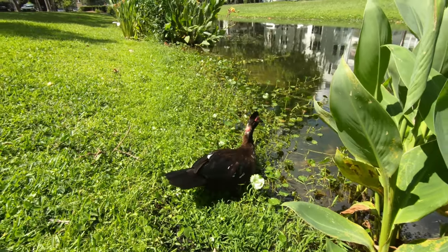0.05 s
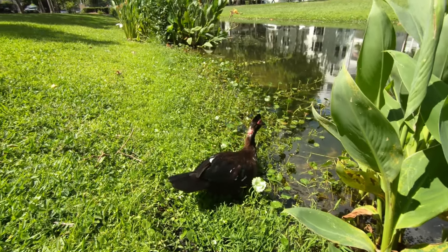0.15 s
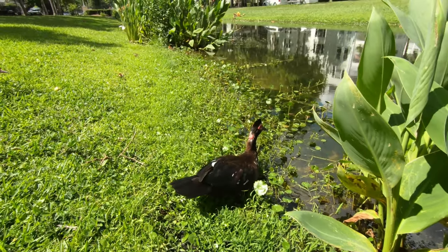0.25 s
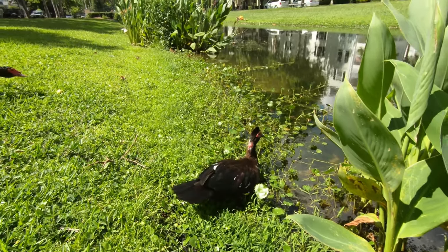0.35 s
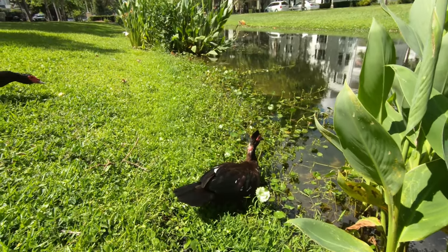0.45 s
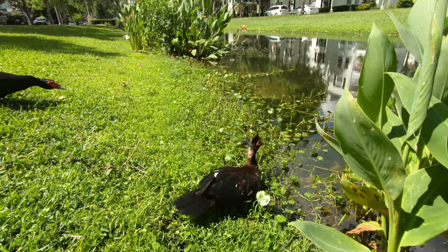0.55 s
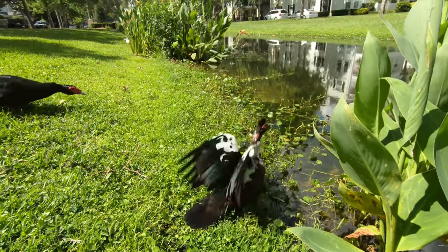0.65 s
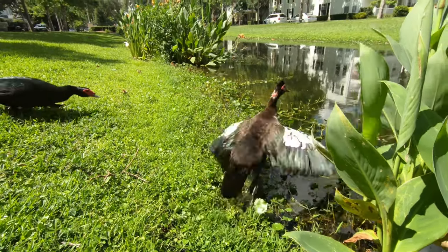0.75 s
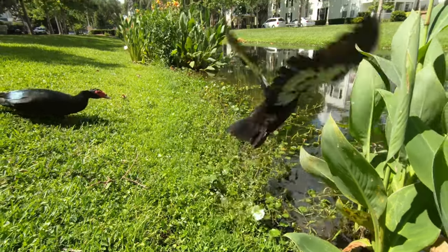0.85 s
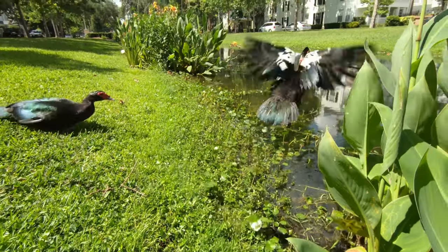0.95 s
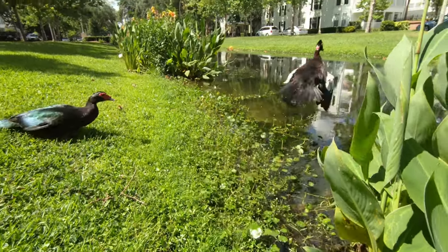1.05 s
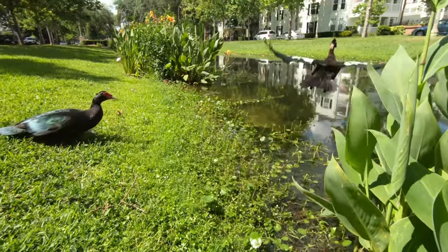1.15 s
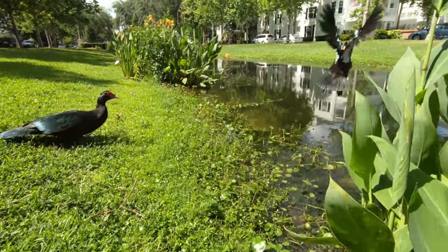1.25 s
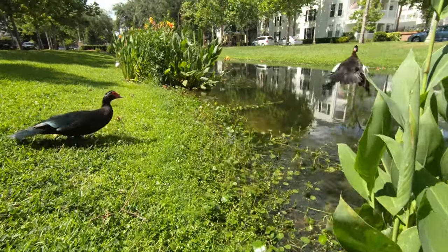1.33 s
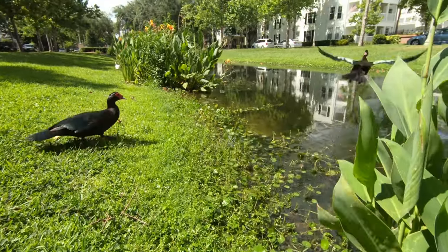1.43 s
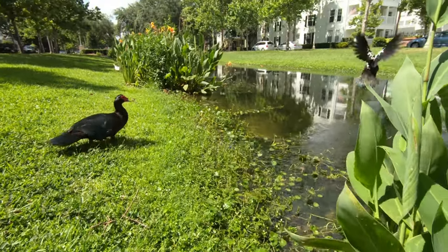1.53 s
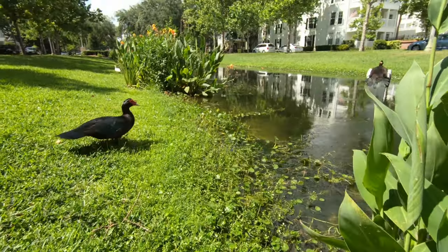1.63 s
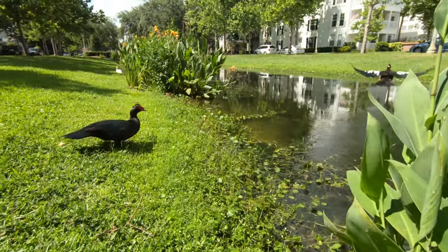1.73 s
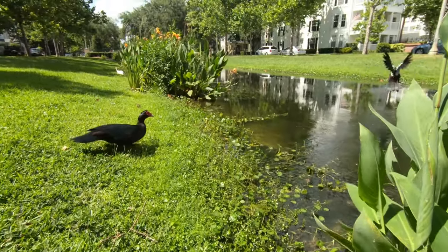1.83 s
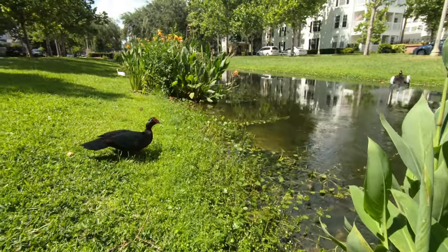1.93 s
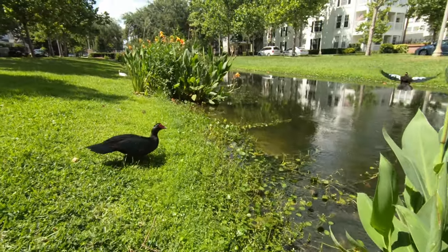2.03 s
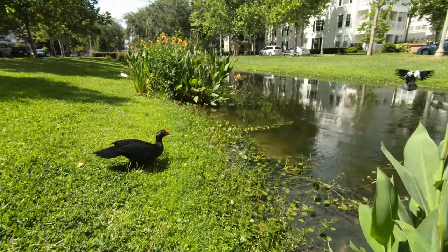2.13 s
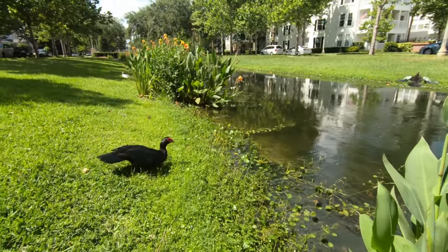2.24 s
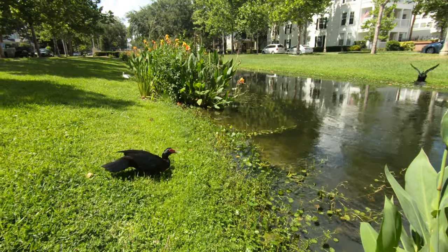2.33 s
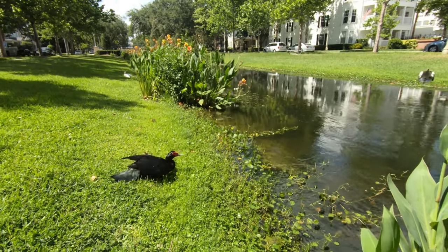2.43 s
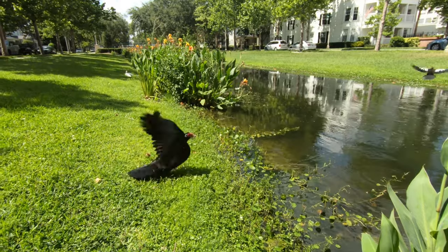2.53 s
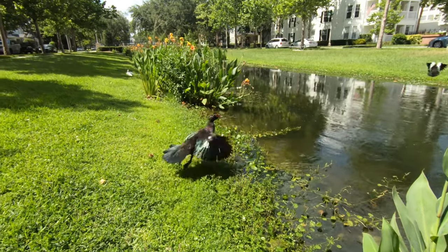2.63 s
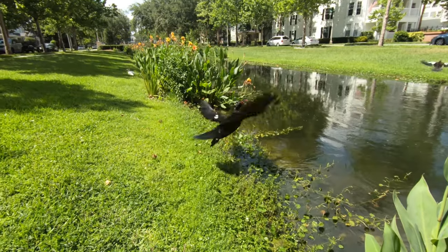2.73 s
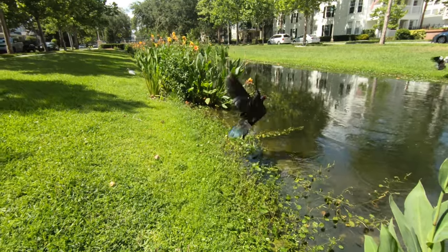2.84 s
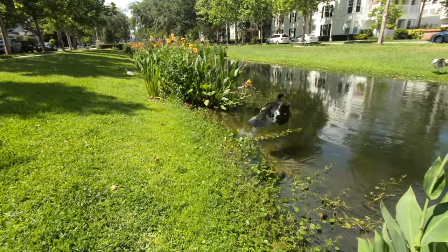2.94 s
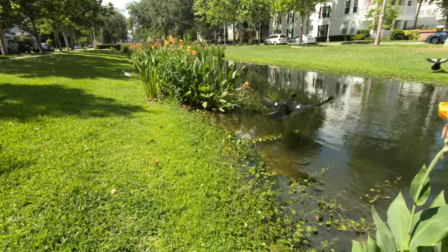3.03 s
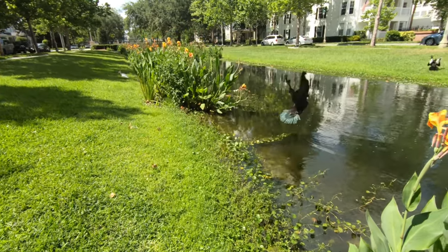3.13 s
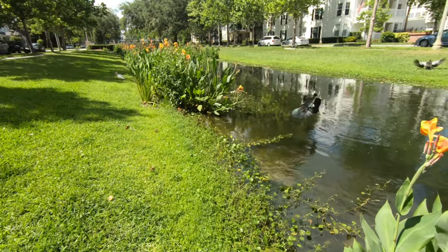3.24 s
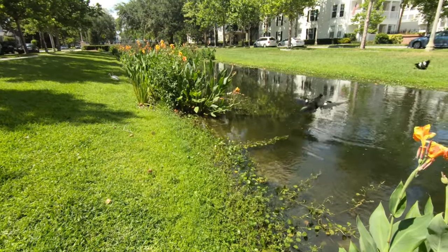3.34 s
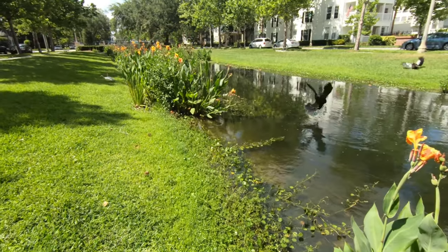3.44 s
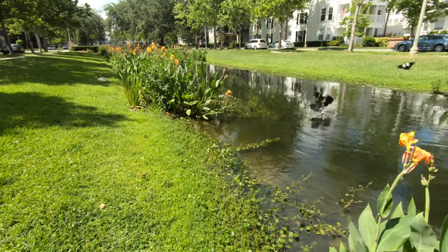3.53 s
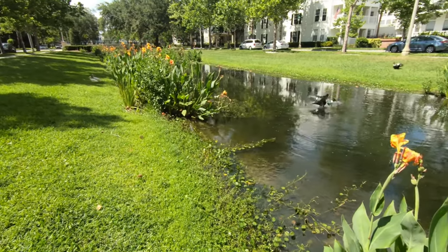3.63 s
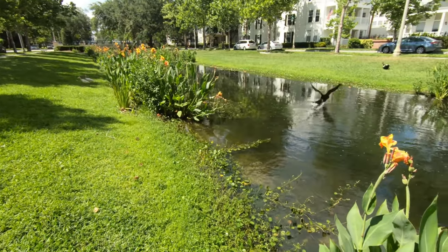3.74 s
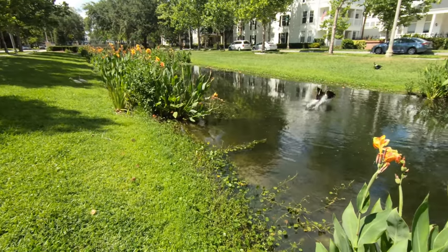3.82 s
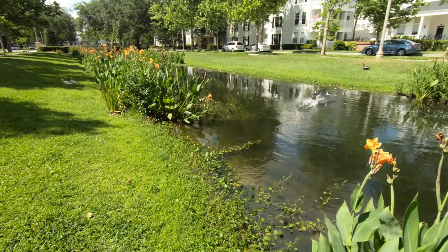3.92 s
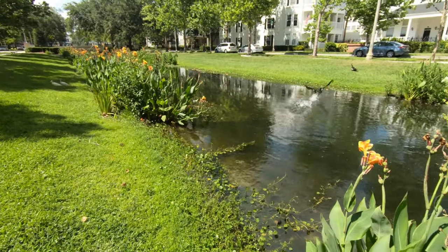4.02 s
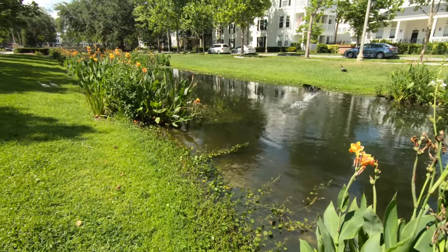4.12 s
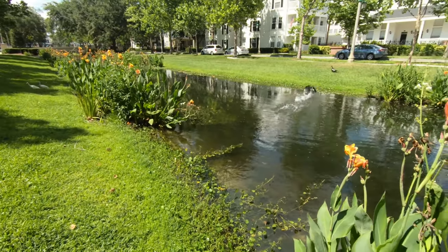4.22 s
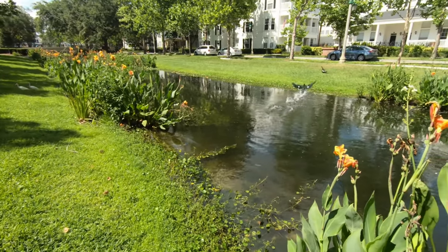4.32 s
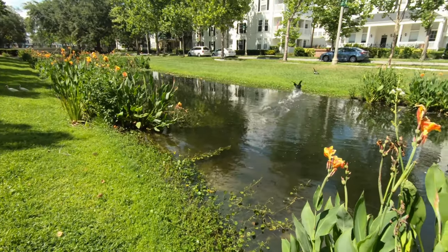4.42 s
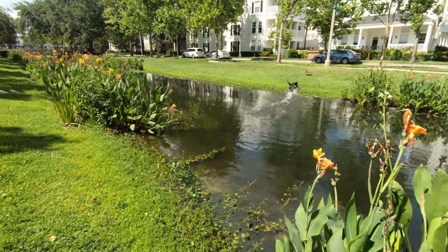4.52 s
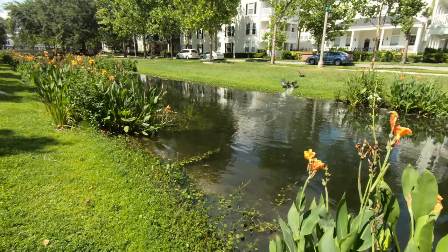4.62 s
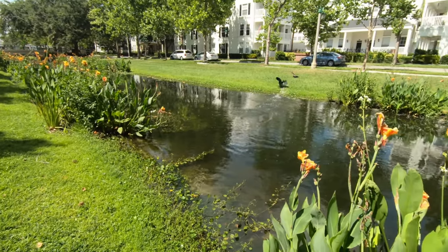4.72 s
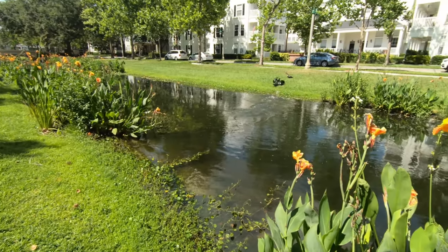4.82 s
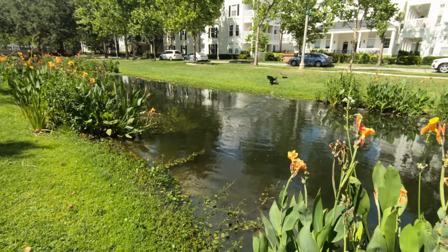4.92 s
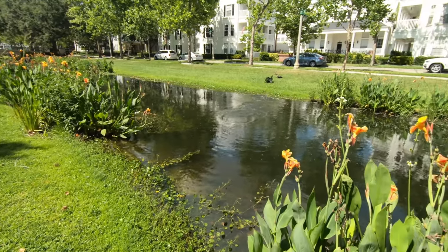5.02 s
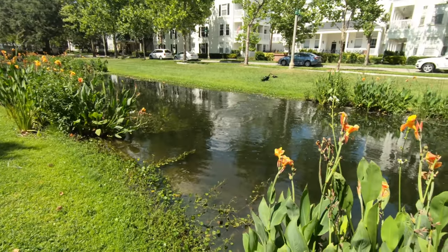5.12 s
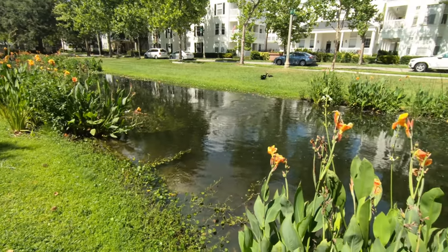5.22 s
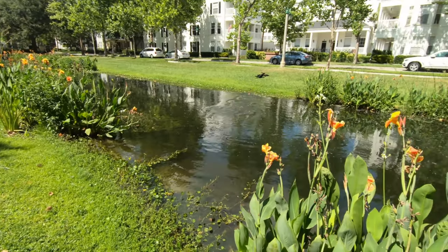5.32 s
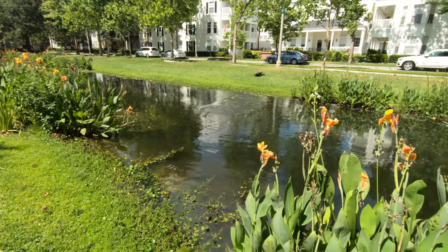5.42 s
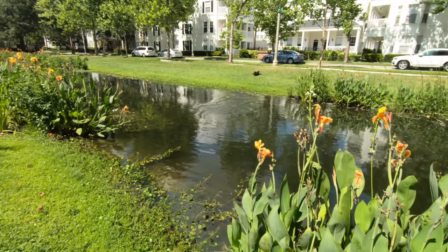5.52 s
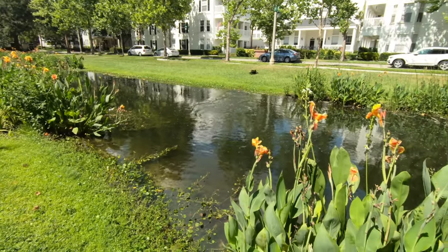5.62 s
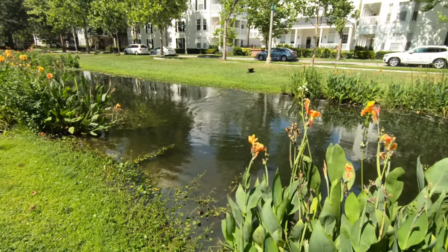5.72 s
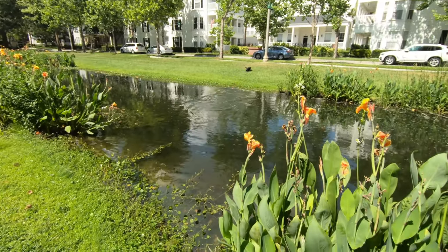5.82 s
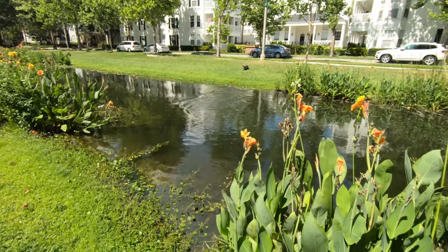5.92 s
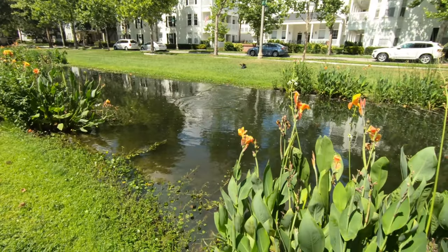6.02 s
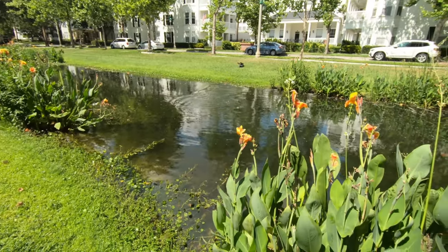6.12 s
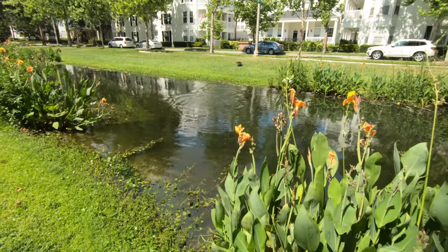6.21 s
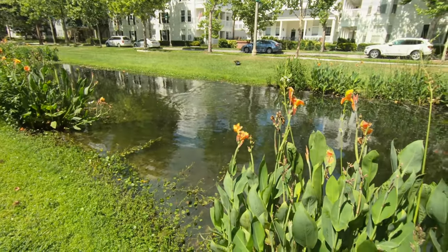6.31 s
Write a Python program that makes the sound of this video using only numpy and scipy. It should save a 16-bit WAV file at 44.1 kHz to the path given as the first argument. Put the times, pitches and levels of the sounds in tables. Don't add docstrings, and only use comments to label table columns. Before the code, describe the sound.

Close wingbeats whoosh and flutter as one duck, then another, takes off over water with slaps, splashes and bubbling, wind thumping softly.

```python
import sys
import numpy as np
from scipy import signal
from scipy.fft import rfft, irfft, next_fast_len
from scipy.io import wavfile
from scipy.ndimage import uniform_filter1d, map_coordinates

SR = 44100
rng = np.random.default_rng(int(sys.argv[2]) if len(sys.argv) > 2 else 0)


def volts(x):
    e = np.asarray(x, float) / 20
    return 10 ** e


def master_out(mix):
    frames = np.transpose(np.atleast_2d(mix))
    ceiling = np.clip(frames, -1, 1)
    pcm = np.round(ceiling * 32767).astype(np.int16)
    wavfile.write(sys.argv[1], SR, pcm)


N = 280506

# [t/s, flutter peak level/dB, flutter f/Hz, overtones level/dB, extra effort/dB]
FIRST_DUCK = [(0.895, -19.5, 223, -6.5, 0), (1.039, -30, 205, -9, -1), (1.183, -32, 210, -15, -1.5),
              (1.327, -31, 226, -7, -1), (1.474, -24.5, 227, -15, 0), (1.619, -38.5, 254, -21, 2),
              (1.765, -35, 200, -3, 0.5), (1.918, -33, 214, -8, 3), (2.064, -41, 224, -5, 0)]
SECOND_DUCK = [(2.773, -24.5, 232, -7.5, -3), (2.918, -20, 233, -4, 1), (3.061, -27.5, 235.5, -3, 0.9),
               (3.212, -28, 214, -23, 2), (3.359, -33, 227, -18, 1.5), (3.51, -29.5, 248, -19, 3.5),
               (3.659, -32, 245, -16, 5.5), (3.803, -29.5, 228, -7, 2), (4.129, -44, 223, -7, 3),
               (4.238, -45.5, 263, 0, 7), (4.371, -41.5, 231, 0, 1), (4.515, -43, 222, -11, 8)]
# [multiple of f, level/dB]
FLUTTER_OVERTONES = [(2, 3), (3, -9.5), (4, -25), (5, -47)]
# [low whoosh level/dB, high whoosh level/dB, upstroke level/dB, fading/(dB/s), upstroke delay/s]
FLIGHT = [
    (-23.5, -21.5, -21.5, 20.5, 0.024),
    (-26.5, -23, -25, 13, 0.038),
]
# [f/Hz, level/dB]
FEATHERS = [(1180, -4), (2000, -8), (2520, 3.5), (3970, 4), (5000, 3.5), (6360, -6.5), (10300, -12),
            (15500, -23)]
# [t/s, peak level/dB, low part/dB, top part/dB, length/s]
SWISHES = [(2.48, -50.5, -5, 5, .06), (2.6, -48, 0, 6, .02), (.93, -34, -3, -2, .008),
           (1.07, -36, 2, -2, .008), (1.213, -39, 0, -1, .005), (1.474, -41, 0, 0, .004),
           (2.965, -37, 2, -9, .008), (3.44, -38, 2, -15, .012), (3.545, -40, 3, -10, 0.007),
           (3.4, -40, 3, -13, 0.0074), (.696, -31.5, -10, -3, .012), (0.723, -37.5, -13, 5.5, 0.029),
           (0.776, -19, -6, -16, 0.0056), (0.987, -23.5, 1.5, -11, 0.0063), (1.25, -37, 1, -20, 0.012),
           (2.566, -29, -5.5, -3, 0.01), (2.648, -29.5, 5, -1, 0.011), (2.752, -33, 8, -20, 0.015),
           (2.634, -27, 0, -4, .004), (4.31, -33, -2, -14, .012), (4.357, -34, 4, -14, 0.0057),
           (1.03, -36, 8, -12, .006), (1.172, -40, 8, -12, .006), (2.688, -24.5, 4.5, -27, 0.011),
           (2.847, -27, -2, -29, 0.011), (3.134, -31.5, -4, -32, 0.017), (3.288, -37, -1, -26, 0.014),
           (3.774, -26, -15, -33, 0.026), (3.997, -34, -14, -16, 0.0069), (4.056, -30.5, -0.5, -19, 0.043)]
# [f/Hz, level/dB]
PLANTS = [(59, -29), (100, -1.5), (349, -5), (550, -6.5), (764, -1.5), (1240, -4), (1600, -5), (1780, -7.5),
          (3300, -7.5), (4620, -4), (5480, -12), (11500, -23.5), (15800, -32)]
# [t/s, peak level/dB, low part/dB, top part/dB]
SLAPS = [(0.7119, -26, 0, -11), (.7975, -15, -9.5, -16), (.729, -30, -15, -16), (1.471, -34, 6, -12),
         (3.249, -35.5, 15, -14), (0.805, -9.5, -7, -18), (2.557, -27, -2, -7), (2.5884, -36, -15, -18),
         (2.6337, -19, 4, 2), (2.762, -21, 3, -4), (3.0504, -42, -6, -13), (3.7064, -26, -16, -23),
         (3.727, -26, -25, -28), (3.742, -30, 2.5, -30), (3.825, -29, -24, -27), (3.89, -23, -5, -25),
         (3.904, -32, 10, -20), (3.9937, -24, -1, -4.5), (4.239, -35, -5, -19), (4.3562, -30.5, 9.5, -20),
         (4.3697, -27.5, 7, -18), (4.492, -29, -3, -6), (4.533, -40, -17, -13), (4.7817, -30, -19, -23),
         (4.8942, -36.5, -14, 1), (4.9213, -39, -15, -20)]
# [t/s, peak level/dB, f/Hz, t60/s, rise/s]
SNAPS = [(0.7958, 0.8, 4040, 0.0026, 0.00011), (2.633, -23, 1680, 0.016, 0.00031),
         (2.634, -23, 2270, .008, 0.00023), (2.6333, -27, 12300, 0.0044, .0001),
         (3.9945, -38, 11000, 0.0037, .0001), (2.6341, -14, 7560, 0.0033, .0001),
         (.8055, -15, 3600, .006, .0003), (5.1, -35, 5000, .003, .0001), (2.694, -26, 2700, 0.051, 0.0032),
         (2.848, -25, 2670, 0.039, 0.0033), (4.3577, -29, 1170, 0.01, .0004), (4.4, -37, 8060, .004, .0002),
         (5.131, -35.5, 6200, 0.0043, 0.00017), (6.18, -42, 8200, 0.0042, .0002)]
# [t/s, fizz level/dB, slosh over fizz/dB, dying/(dB/s)]
SPRAY = [(.705, -43.5, 0, 12.5), (0.781, -34.5, 4, 68), (.9, -42, 3, 90), (1.0, -57, 7, 3),
         (2.64, -45.5, 6.5, 50), (2.78, -41, 8, 57), (2.939, -41.5, 7.5, 77), (3.05, -49.5, 5.5, 6),
         (3.681, -42, -11, 22), (3.84, -56, 9, 34), (3.96, -43.5, -3.5, 21), (4.14, -46.5, 2, 22),
         (4.35, -44.5, 1.5, 31), (4.52, -49, -12, 31), (4.68, -57, 2, 29)]
# [f/Hz, level/dB]
FIZZ = [(1180, -39), (2000, -4.5), (2930, -7.5), (3630, -4.5), (4710, -2), (6000, -12.5), (8550, -15),
        (8780, -15.5), (11000, -16.5), (15800, -30)]
SLOSH = [(180, 1), (300, 1), (500, -4.5), (1000, -6), (1700, -6), (2500, -22), (3300, -32), (5500, -120)]
# [f/Hz, level/dB]
DROPS = [(2200, -14), (2900, -8), (3600, -5.5), (4300, -1), (5000, -9), (7500, -12)]
# [t of the peak/s, peak level/dB, f/Hz]
AIR_POCKETS = [(.812, -27, 1140), (.8427, -22.5, 754), (.867, -30, 1300), (.9305, -35, 1470),
               (.9683, -37, 1150), (1.0512, -31, 452), (1.0814, -37, 474), (1.255, -38, 800),
               (1.3944, -39, 797), (2.6671, -33.5, 624), (2.8423, -31.5, 668), (2.9093, -29, 603),
               (2.9971, -39, 1460), (3.1521, -39, 1440), (3.2256, -37, 592), (4.5038, -39, 1690),
               (0.9941, -32, 430.0), (1.0362, -27, 387), (1.0434, -31, 715), (1.1828, -37, 730.0),
               (1.19, -25, 420), (1.3293, -38, 786), (2.6993, -31, 926), (2.7661, -29, 700),
               (2.7661, -25.5, 1675), (2.7704, -27.5, 980), (2.8082, -28, 540), (2.8096, -27.5, 816),
               (2.8212, -33, 1360), (2.917, -33.5, 1860), (2.9185, -31, 910), (2.9185, -24, 560.0),
               (2.9228, -33, 1120.0), (3.0578, -37, 940), (3.0607, -30.5, 1790), (3.0636, -34, 2080),
               (3.0737, -27.5, 515), (3.1057, -35, 1070), (3.1449, -38, 1030.0), (3.2073, -34, 1070),
               (3.2145, -34, 830), (3.216, -31, 1400), (3.216, -32, 506), (3.2537, -32, 1070),
               (3.258, -32, 564), (3.364, -31.5, 1440), (3.3698, -34, 980), (3.5106, -30, 1440),
               (3.5164, -30.5, 1010), (3.5498, -34, 1020), (3.6571, -39, 1360), (3.66, -40, 1597),
               (3.6615, -29, 480), (3.7442, -35, 1555), (4.2405, -36.5, 1680.0), (4.242, -35, 438),
               (4.2638, -35.5, 520.0), (4.3595, -38, 474), (4.3595, -35.5, 1635), (4.3595, -40, 1050)]
# [t of the peak/s, peak level/dB, f/Hz]
DRIPS = [(.7983, -16, 3970), (.8655, -29, 4770), (.9005, -28, 4610), (.908, -30, 3700), (.9232, -28, 3830),
         (.991, -31, 3700), (.991, -33, 4700), (1.078, -33, 4300), (1.217, -36, 5000), (2.5663, -37, 3000),
         (2.588, -33, 5000), (2.6418, -33, 2930), (2.9488, -37, 4020), (3.6663, -33, 4750),
         (3.7055, -33, 4830), (4.5017, -38, 4230), (0.7787, -26, 4410.0), (0.8159, -23, 4690.0),
         (0.8186, -25, 3000), (0.8254, -18, 2780), (0.8277, -24, 3760), (0.8313, -18, 4690.0),
         (0.8417, -16, 4580), (0.849, -21, 4450), (0.8526, -31, 3470), (2.6893, -28, 4270.0),
         (2.6952, -32, 2700), (2.7651, -36, 3170.0), (2.7669, -26, 4200), (2.8535, -33, 2730),
         (2.9469, -41, 4690.0), (3.0676, -30, 4820.0), (3.2122, -27.5, 4200), (3.6866, -29.5, 3860.0),
         (3.7075, -33, 3860.0), (3.7202, -34, 4160), (3.7293, -33, 4690.0), (3.7315, -28, 3860.0),
         (3.746, -30, 2760.0), (3.8227, -33, 4100), (3.8259, -35, 4960.0), (3.8286, -31, 3580.0),
         (3.8494, -39, 4810), (3.8576, -40, 4550.0), (3.8912, -28, 3980), (3.9737, -41, 4440),
         (3.9955, -27, 4820.0), (4.0014, -30, 3660), (4.0127, -32, 3720.0), (4.0599, -37, 4820.0),
         (4.0608, -33, 2870), (4.239, -38, 4000.0), (4.2798, -32, 4270.0), (4.4934, -33, 4500),
         (4.4939, -38, 3600), (4.5175, -38, 4690.0), (4.5351, -32, 3720.0), (4.5356, -31, 5400),
         (4.5356, -29, 4650), (4.5914, -40, 4960.0)]
# [t of the peak/s, peak level/dB, f/Hz]
FINE_SNAPS = [(.7969, -30, 7220), (.8157, -28, 8850), (.8236, -28, 7750), (.8444, -32, 7350),
              (.8541, -28, 8850), (.8581, -30, 7330), (.8652, -34, 10100), (1.0769, -39, 10400),
              (2.5562, -44, 7470), (2.5562, -44, 11500), (2.589, -42, 9000), (2.589, -43, 12500),
              (2.6444, -39, 7440), (2.657, -40, 6200), (2.7627, -41, 8030), (3.2142, -39, 7120),
              (3.6861, -43, 7800), (3.744, -33, 2100), (4.241, -36, 1500), (4.3585, -31, 1400),
              (4.3715, -34, 1100), (4.377, -37, 2500), (4.534, -40, 6500), (4.895, -41, 6000),
              (4.895, -43, 9500), (5.131, -43, 7500), (2.912, -30, 3500), (2.912, -36, 7000)]
# [t/s, delay/ms, level/dB]
WATER_MIRROR = [(2.5, 1.3, -36), (2.6, 1.32, -12), (2.85, 1.3, -18), (2.95, 1.9, -10), (3.3, 2.18, -21),
                (3.7, 1.85, -12.5), (4.8, 1.76, -8)]
# [t/s, f/Hz, level/dB]
CHIP = [(4.262, 8500, -75), (4.28, 8370, -57), (4.298, 8380, -51), (4.31, 8300, -54), (4.33, 7700, -58),
        (4.352, 7100, -59), (4.365, 7400, -60), (4.38, 7400, -72)]
# [t/s, strength level/dB]
WIND = [(0.0, -32.5), (0.1, -41), (0.6, -36), (0.71, -47), (0.8, -27), (1.38, -37), (1.47, -22),
        (1.56, -28.5), (1.65, -22), (1.78, -31.5), (2.02, -22.5), (2.11, -32), (3.52, -33.5), (3.56, -39),
        (4.75, -38.5), (4.89, -28), (5.05, -35), (6.36, -37.5)]
# [t/s, peak level/dB, f/Hz, rise/s]
PUFFS = [(.55, -30.5, 30, 0.023), (1.453, -15, 24, 0.012), (1.487, -22, 42, .008), (1.613, -13, 32, .008),
         (2.01, -21, 18, .015), (1.615, -14, 46.5, 0.027), (1.61, -14.5, 20.5, 0.041),
         (1.989, -25, 31, 0.01), (2.39, -24, 26, 0.0093), (2.503, -26.5, 37, 0.021),
         (3.049, -22.5, 23, 0.022), (3.471, -27, 27, 0.018), (4.089, -31, 23.8, 0.024),
         (4.861, -35, 20.6, 0.042), (5.43, -38, 45, 0.028), (5.689, -30, 24, 0.017),
         (6.322, -34, 44.3, 0.033)]
# [f/Hz, level/dB]
BUFFET = [(4.7, -39), (8.0, 23), (27, 5), (60, -2.5), (78, -58), (130, -120)]
THUD = [(29, -31), (50, 0), (86, -6.5), (135, -13), (167, -17), (200, -23.5), (260, -25.5), (440, -120)]
# [f/Hz, level/dB]
TOWN = [(71, -62), (120, -3.5), (200, -5), (295, -9), (378, -11), (410, -12), (670, -11), (727, -11.5),
        (1010, -13.5), (2290, -15), (3300, -17), (4500, -15), (6240, -27.5), (15000, -31), (16000, -32)]
# [t/s, level/dB]
CAR = [
    (0, -108),
    (2.3, -62.5),
    (4.8, -53.5),
    (5.6, -57.5),
    (6.36, -55.5),
]
# [t/s, level/dB]
LEAVES = [(0, -58.5), (.6, -59), (2.3, -65.5), (4.8, -75), (6.36, -78)]
# [t/s, f/Hz, level/dB]
ENGINE = [
    (5.3, 61.9, -63),
    (5.5, 65, -40),
    (5.65, 68.3, -45),
    (6.1, 67.6, -40.5),
    (6.25, 65, -60),
]
# [f/Hz, level/dB]
HISS = [(100, -30), (300, -1), (1300, -5.5), (4500, -4.5), (6000, -4.5), (12000, -3), (15500, -6),
        (16000, -20)]


def flutter():
    out, t = np.zeros(N), np.arange(N) / SR
    drift = 0.1 * wobble(60)
    unsteady = [volts(level + 1.3 * wobble(50)) for _, level in FLUTTER_OVERTONES]
    for s, db, hz, over_db, _ in FIRST_DUCK + SECOND_DUCK:
        age = np.clip(t - s, -.05, .1)
        phase = 2 * np.pi * (hz * (age - 3 * (age - .008) ** 2) + drift)
        overtones = sum(gain * np.cos(k * phase) for (k, _), gain in zip(FLUTTER_OVERTONES, unsteady))
        out += volts(db - 0.5) * swell(s - .014, .02, 11.8) * (np.cos(phase) + volts(over_db - 5.0) * overtones)
    return out


def strokes():
    rows = []
    for duck, (low_db, high_db, up_db, fade, delay) in zip((FIRST_DUCK, SECOND_DUCK), FLIGHT):
        for s, *_, effort_db in duck:
            db = effort_db - fade * (s - duck[0][0])
            rows.append((s, low_db + db, high_db + db, s + delay, up_db + db))
    return rows


def wings():
    low = sum(volts(low_db - 7.5) * swell(s - .015, 0.017, 3.0) for s, low_db, *_ in strokes())
    high = sum(volts(high_db - 11.0) * swell(s - .014, 0.017, 3.8) for s, _, high_db, *_ in strokes())
    return low * band(285, 1560, grain_db=-1.5) + high * rush(FEATHERS, 0.3, 2.5)


def leap():
    rise_s, hold_s, sag_db, fall_db_per_s = 0.011, 0.037, 3, 1100
    age = np.arange(N) / SR - .807
    held = age - rise_s
    loss_db = sag_db * np.clip(held / hold_s, 0, 1) + fall_db_per_s * np.clip(held - hold_s, 0, .2)
    level = np.clip(age / rise_s, 0, 1) ** 2 * volts(-20 - loss_db + wobble(200))
    return level * rush(PLANTS, 0.34, grain_db=2.0)


def swishes():
    upstrokes = [(s, db, 1, -9, 0.013) for *_, s, db in strokes()]

    def plough(s, length):
        return swell(s - .004, length, 1.07)

    return volts(-2.0) * bursts(SWISHES + upstrokes, plough, grain_db=1.0)


def slaps():
    decay_s, tick_db, tick_hz, tick_t60_s = 0.0046, -5, 4270, 0.0026

    def crack(s, length):
        return swell(s, length / 5, 1 / 4)

    ticks = np.zeros(N)
    for s, db, *_ in SLAPS:
        hz = tick_hz * volts(rng.normal(0, 1.0))
        ticks += ring(s + 0.000895, db + tick_db, hz, tick_t60_s, 0.00012)
    body = bursts([(*row, decay_s) for row in SLAPS], crack, grain_db=-1.5)
    return body + ticks + sum(ring(*row) for row in SNAPS)


def spray():
    splash_rise_s, lull_db, lull_lead_s, lull_s = 0.017, 2, 0.038, 0.023
    fizz, slosh, t = np.zeros(N), np.zeros(N), np.arange(N) / SR
    for s, db, slosh_db, dying in SPRAY:
        age = np.clip(t - s, 0, None)
        power = volts(2 * (db - dying * age)) * (1 - np.exp(-age / splash_rise_s)) ** 2
        fizz += power
        slosh += volts(2 * slosh_db) * power
    lull = sum(swell(s - lull_lead_s, lull_s, 5.2) for s, *_ in strokes())
    clumps_db = wobble(24.56) - lull_db * lull
    patter = rush(FIZZ, 0.73, 2.2) + volts(-7.5) * droplets(per_second=70, spread_db=7.5, cycles=2.3)
    plops = droplets(per_second=45, spread_db=2.0, cycles=2.0, pitch=0.239)
    wake = rush(SLOSH, 0.65, 3.0) + volts(-16) * plops
    wake_db = 1.24 * wobble(40) - 1.5 + 0.81 * clumps_db
    return np.sqrt(fizz) * volts(clumps_db) * patter + np.sqrt(slosh) * volts(wake_db) * wake


def droplets(per_second, spread_db, cycles, pitch=1):
    out, t = np.zeros(N), np.arange(SR // 50) / SR
    for hz, db in np.multiply(DROPS, [pitch, 1]):
        size = np.clip(rng.exponential(size=N), 0, 2.2)
        hits = (rng.random(N) < per_second / SR) * volts(db + spread_db * size)
        drop = np.sin(2 * np.pi * hz * t) * hz * t * np.exp(-t * hz / cycles)
        out += signal.fftconvolve(hits, drop)[:N]
    return unit(out)


def bubbles(rows, length, gain_db):
    out, age, middle_hz = np.zeros(N), np.arange(SR // 25) / SR, np.median(rows, axis=0)[2]
    for (s, db, hz), turn in zip(rows, rng.random(len(rows))):
        rise = length * (middle_hz / hz) ** .35
        shape = (age / rise * np.exp(1 - age / rise)) ** 2
        cycles = hz * (age + 5.4 * (age - rise) ** 2 / 2)
        tone = np.sin(2 * np.pi * (cycles + turn))
        out[round((s - rise) * SR):][:len(age)] += volts(db + gain_db) * shape * tone
    return out


def over_water(x):
    delay_ms, db = curves(WATER_MIRROR)
    n = np.arange(N)
    mirrored = np.interp(n - delay_ms * SR / 1000, n, x)
    return (x + volts(db) * mirrored) / np.sqrt(1 + volts(2 * db))


def bird():
    hz, db = curves(CHIP)[0], curves(CHIP, -120)[1]
    chip = volts(db + 6.5 + 1.5 * wobble(150)) * np.sin(2 * np.pi * np.cumsum(hz) / SR)
    t = np.arange(SR // 4) / SR
    echo = rng.standard_normal(len(t)) * volts(-60 * t / 0.34)
    return chip + volts(-4) * signal.fftconvolve(chip, echo / np.linalg.norm(echo))[:N]


def wind():
    mean_db, swing = -47.5, 0.67
    puff_db, puff_db_per_hz = -24, 0.94
    downwash_db, downwash_s = -24.5, 0.078
    strength_db, = curves(WIND)
    t = np.arange(N) / SR
    ragged = 0.3 * wobble(45)
    puffs = np.zeros(N)
    thud = volts(mean_db + swing * (strength_db - strength_db.mean()) + 1.45 * wobble(6.5))
    for s, db, hz, rise in PUFFS:
        puffs -= volts(db) * swell(s, rise, 1.4) * np.sin(2 * np.pi * hz * (t - s) + ragged)
        thud_db = db + puff_db + puff_db_per_hz * (hz - 33.0)
        thud += volts(thud_db) * swell(s + 0.0093, rise * 1.2, 1.9)
    for s, low_db, *_ in strokes():
        thud += volts(low_db + downwash_db) * swell(s - .05, downwash_s, 1.9)
    return volts(strength_db - 2.0) * rush(BUFFET) + thud * rush(THUD) + puffs


def town():
    hz, db = curves(ENGINE)[0], curves(ENGINE, -120)[1]
    engine = volts(db + 2 * wobble(12)) * np.sin(2 * np.pi * np.cumsum(hz + 3 * wobble(9)) / SR)
    car = volts(curves(CAR)[0]) * band(545, 1400, grain_db=0.5)
    leaves = volts(curves(LEAVES)[0]) * band(2700, 8100, grain_db=-0.5)
    return volts(-49.5 + 0.039 * wobble(1.7)) * rush(TOWN, patchy_db=1.0) + car + leaves + engine


def bursts(rows, envelope, grain_db):
    low, mid, top = np.zeros((3, N))
    for s, db, low_db, top_db, length in rows:
        shape = volts(db - 14) * envelope(s, length)
        low += volts(low_db) * shape
        mid += shape
        top += volts(top_db) * shape
    body = low * band(443, 1750, grain_db)
    presence = mid * band(3190, 4670, grain_db)
    return body + presence + top * band(4400, 11000, grain_db)


def ring(s, db, hz, t60, rise):
    out, start = np.zeros(N), int(np.ceil(s * SR))
    age = np.arange(start, min(N, start + SR // 8)) / SR - s
    level = volts(db - 60 * age / t60) * (1 - np.exp(-age / rise))
    out[start:start + len(age)] = level * np.sin(2 * np.pi * hz * age)
    return out


def swell(s, length, sharp):
    out, start, length = np.zeros(N), max(int(np.ceil(s * SR)), 0), max(length, 1e-4)
    end = min(N, start + int((1 + 14 / sharp) * length * SR))
    u = (np.arange(start, end) / SR - s) / length
    out[start:start + len(u)] = (u * np.exp(1 - u)) ** sharp
    return out


def band(lo_hz, hi_hz, grain_db):
    edges = [(lo_hz / 8, -90), (lo_hz / 2, -25), (lo_hz, 0), (hi_hz, -3), (hi_hz * 1.86, -20), (hi_hz * 8, -90)]
    return rush(edges, 1.8, grain_db)


def rush(points, patchy_db=0, grain_db=0):
    z = signal.stft(rng.standard_normal(N), nperseg=512)[2]
    field = uniform_filter1d(uniform_filter1d(rng.standard_normal(z.shape), 6, 0), 8, 1)
    x = signal.istft(z * volts(patchy_db * unit(field)), nperseg=512)[1][:N]
    return coloured(x * volts(grain_db * wobble(900)), points)


def coloured(x, points):
    m = next_fast_len(N + 8192)
    hz, db = np.transpose(points)
    gain = volts(np.interp(np.log(np.fft.rfftfreq(m, 1 / SR) + 1), np.log(hz + 1), db))
    return unit(irfft(rfft(x, m) * gain, m)[:N])


def unit(x):
    return x / np.sqrt(np.mean(x ** 2) + 1e-20)


def curves(rows, outside=None):
    s, *cols = np.transpose(rows)
    return [np.interp(np.arange(N) / SR, s, c, outside, outside) for c in cols]


def wobble(rate):
    knots = rng.standard_normal(int(N * rate / SR) + 4)
    return map_coordinates(knots, [np.arange(N) * rate / SR])


def scene():
    ducks = flutter() + over_water(wings() + slaps() + leap() + swishes() + spray())
    cavities = bubbles(AIR_POCKETS, 0.00445, -2) + bubbles(DRIPS, 0.001097, -2.5)
    cavities += bubbles(FINE_SNAPS, .0004, 0.0)
    around = wind() + town() + bird()
    return np.tile(ducks + around + cavities, (2, 1))


def top_cut(x):
    return signal.sosfilt(signal.butter(12, 16460, fs=SR, output="sos"), x)


def record(dry):
    difference = volts(-69.5) * rush(HISS, patchy_db=4.0) + volts(-45) * wobble(30) * dry[0]
    both = dry + [difference, -difference]
    limited = irfft(rfft(both) * (np.fft.rfftfreq(N, 1 / SR) < 15800), N)
    return top_cut(limited)


dry = scene()
out = record(dry)
master_out(out)
```